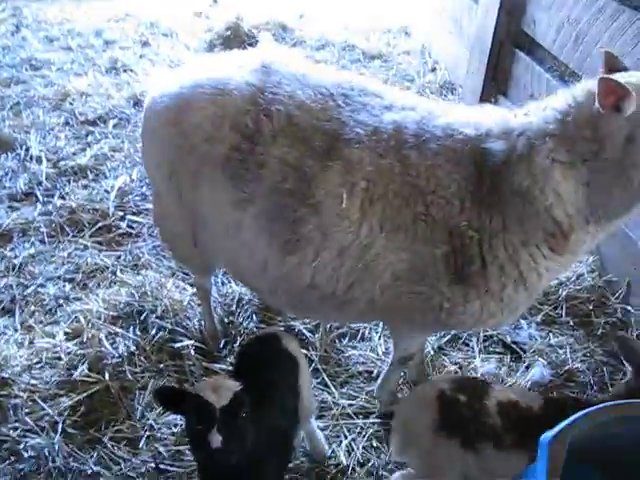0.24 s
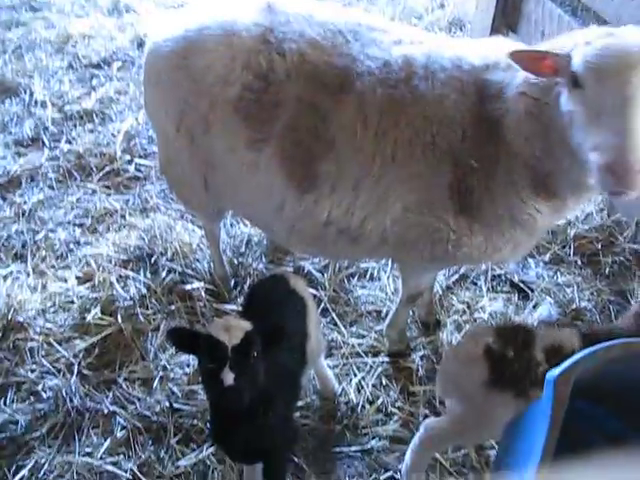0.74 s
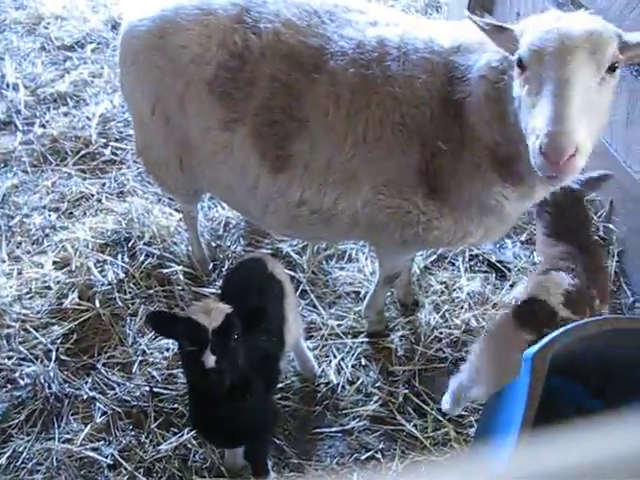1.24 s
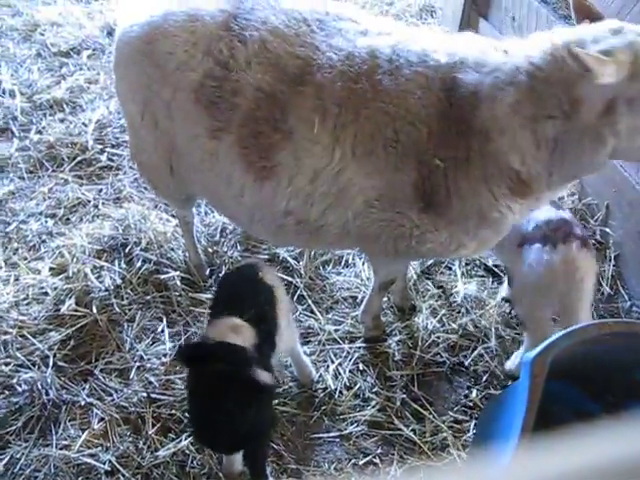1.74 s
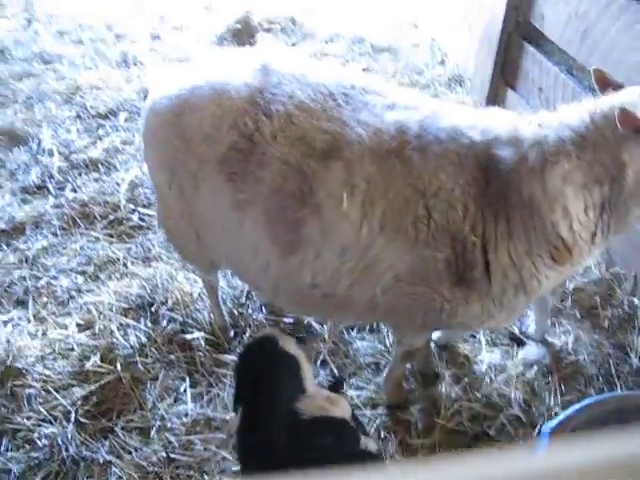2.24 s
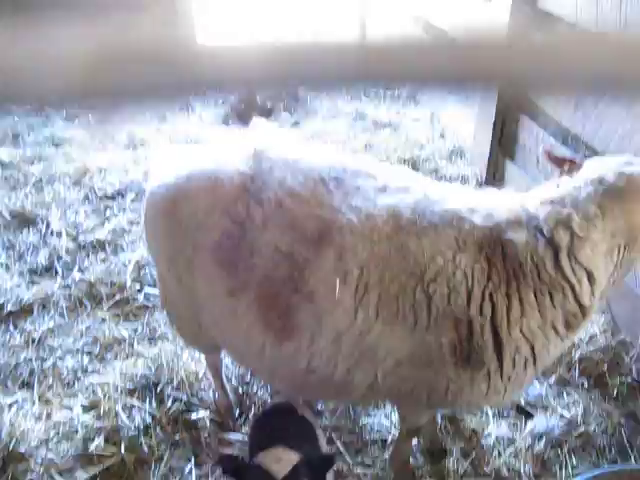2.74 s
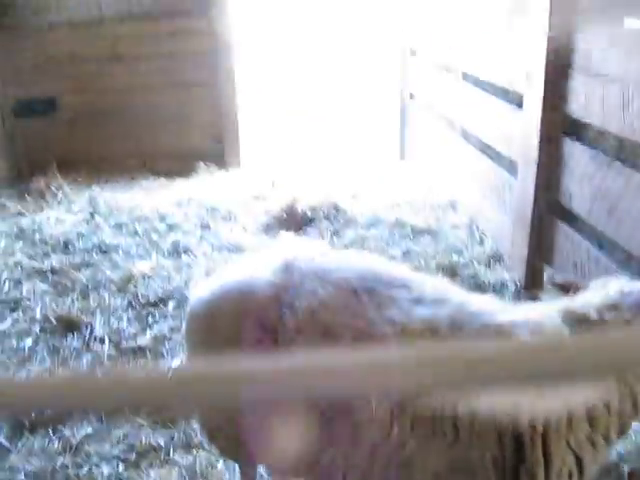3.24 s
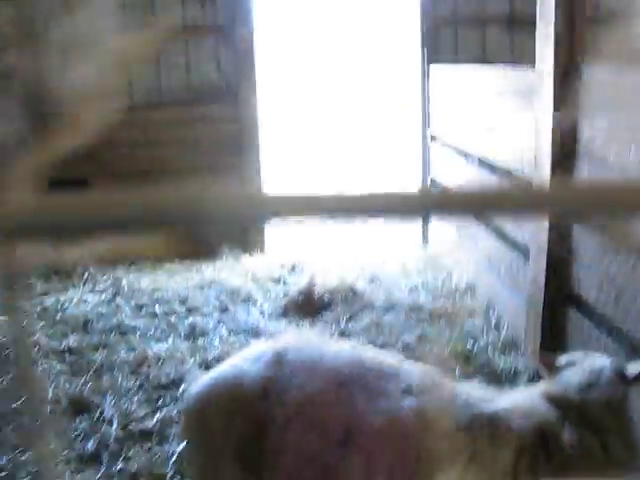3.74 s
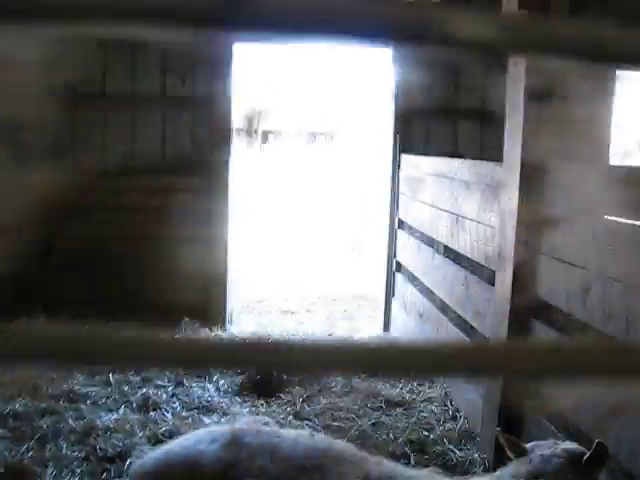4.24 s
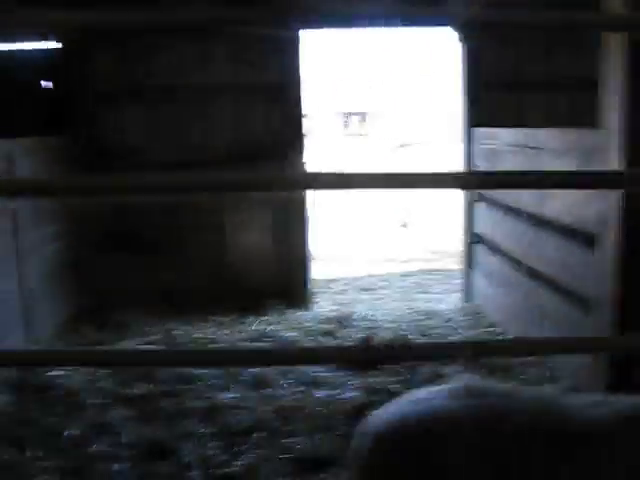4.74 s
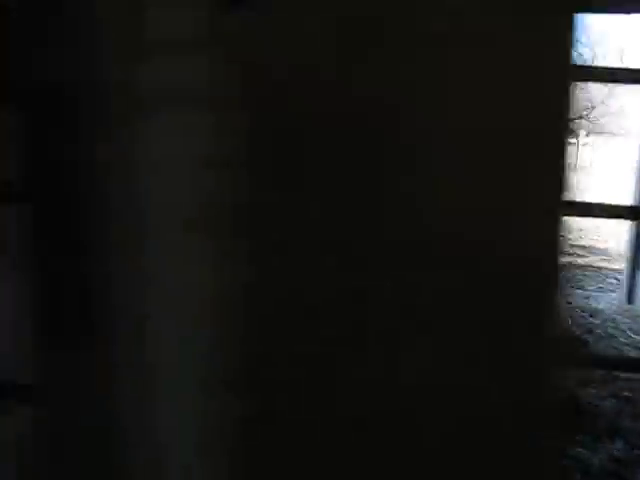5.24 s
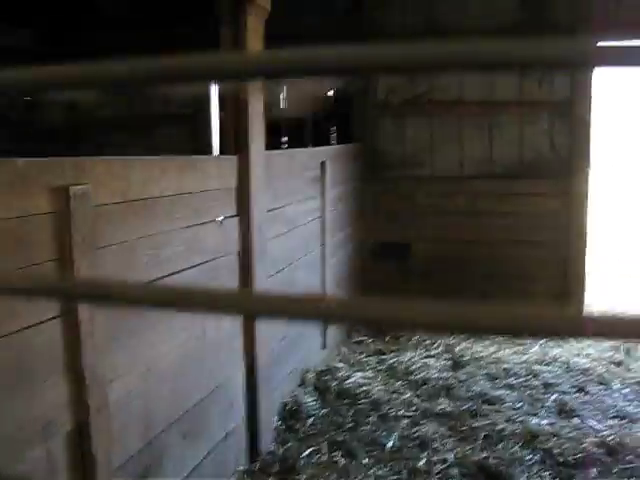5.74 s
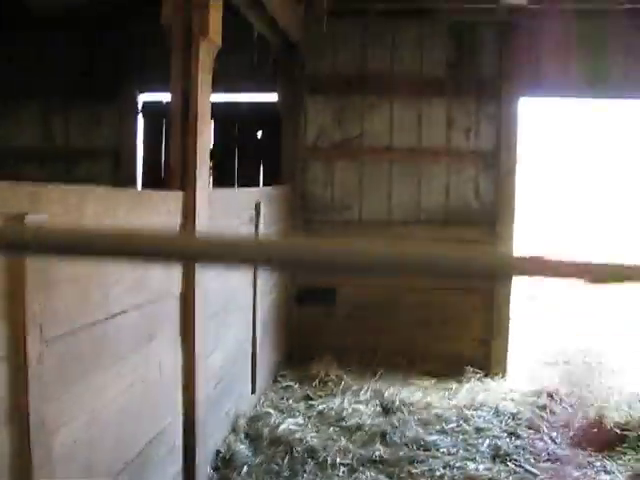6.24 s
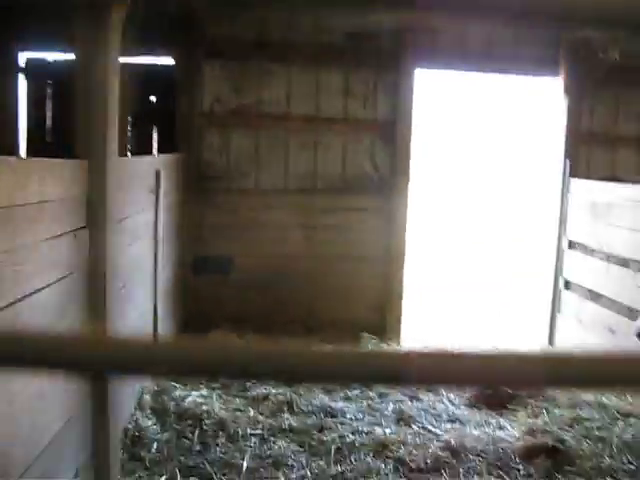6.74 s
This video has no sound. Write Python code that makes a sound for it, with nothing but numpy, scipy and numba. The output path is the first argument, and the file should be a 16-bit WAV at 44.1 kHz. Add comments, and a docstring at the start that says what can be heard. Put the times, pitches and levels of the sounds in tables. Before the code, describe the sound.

In a wooden barn pen, straw crackles and hooves knock; a hoarse lamb bleats quiveringly, later a clear lamb calls and the hoarse one answers.

```python
"""A straw-bedded pen in a wooden barn, over a low murmur: first hooves knock on boards, straw crackles, a gate
squeaks and cloth brushes near the microphone. A hoarse lamb bleats with a fast quiver, an animal further off grunts
and yelps, birds whistle outside, the gate chirps, a clear lamb holds one long note and the hoarse one answers.
Voices are fold pulses and breath through throat resonances; straw is clicks in ringing stalks, hooves are bursts
in a board's resonance, gate and birds are gliding sines, and cloth and murmur are coloured noise."""
import sys
import numpy as np
from scipy import signal
from scipy.io import wavfile
from scipy.ndimage import uniform_filter1d
from numba import njit

SR = 44100
rng = np.random.default_rng(int(sys.argv[2]) if len(sys.argv) > 2 else 0)


def wrap_up_sound(samples):
    """Save the sound to the file named by the first command line argument, as 16-bit audio."""
    columns = np.atleast_2d(samples).T
    # keep every value between -1 and 1, then stretch to whole-number steps
    tamed = np.clip(columns, -1, 1)
    steps = np.round(tamed * 32767).astype(np.int16)
    wavfile.write(sys.argv[1], SR, steps)


N = 308700

# Calls of the hoarse lamb, the clear lamb and the animal further off (a yelp that breaks to a lower note, two grunts).
# Each row of a call: time in seconds, pitch in Hz before the quiver, level in dB before the quiver.
HOARSE_CALLS = [
    [(2.62, 253.3, -61), (2.635, 266, -27), (2.655, 302, -24.5), (2.675, 294, -60)],
    [(2.69, 293.7, -40), (2.722, 317.9, -20), (2.755, 300, -30.5), (2.785, 316.4, -17.5),
     (2.86, 336.5, -22), (2.92, 363.3, -23), (3.1, 369.4, -25.5), (3.2, 369.8, -23), (3.3, 355.6, -23),
     (3.39, 355.6, -23.5), (3.415, 337, -24)],
    [(6.62, 310.7, -49), (6.72, 326.6, -27.5), (6.78, 327.8, -21.5), (6.85, 340.4, -21.5),
     (6.92, 350, -23.5), (7.0, 368, -20)],
]
CLEAR_CALLS = [
    [(6.0, 262, -49), (6.05, 272.6, -37.5), (6.09, 306, -26.5), (6.11, 296.4, -34.5), (6.13, 299.2, -18),
     (6.155, 346.3, -19.5), (6.2, 354.5, -20), (6.29, 360.8, -22.5), (6.37, 362.9, -19.5),
     (6.5, 357.5, -19.5), (6.6, 357.8, -19.5), (6.69, 347, -21.5), (6.735, 332.4, -16.5), (6.76, 343, -54)],
]
YELP_CALLS = [
    [(4.6, 375.6, -46), (4.62, 397.7, -33.5), (4.64, 521.3, -24.5), (4.68, 521.4, -18), (4.688, 455, -19),
     (4.715, 455.7, -14.5), (4.74, 449.5, -30), (4.77, 449.6, -23), (4.8, 452, -42), (5.02, 451, -49)],
    [(4.255, 302, -36.5), (4.28, 299, -41.5), (4.36, 292, -52)],
    [(4.47, 310, -51), (4.49, 297, -42), (4.54, 297, -71)],
]
# Manner of each call. Each row: time the voice takes hold in seconds, strain until then (0-1),
# easing time of the strain in seconds, quiver rate per second and quiver depth (0-1), both as the voice takes hold.
HOARSE_MANNER = [(2.788, 0.64, .2, 15.2, 0), (2.786, 0.68, 0.18, 15.6, .58), (6.74, 0.89, 0.08, 13.0, 1.0)]
CLEAR_MANNER = [(6.199, 0.79, 0.32, 12.04, 0.037)]
YELP_MANNER = [(4.67, 0.97, 0.031, 11.6, .05), (4.255, 0.04, 0.092, 12, .2), (4.47, 0.045, .1, 12, .1)]
# Throat and mouth resonances. Each row: centre in Hz, width in Hz, gain in dB, then the shift in Hz
# and the rise in dB at full strain.
HOARSE_THROAT = [(306, 60, -21, -20, 15), (705, 170, -9, -8, 2.5), (1450, 200, 2.5, -220, 1),
                 (3200, 440, -0.5, -200, 0), (4570, 450, 2, 50, 1.5), (5440, 650, -3.5, 400, 6.5),
                 (9830, 2570, -16, 1, 7)]
CLEAR_THROAT = [(330, 120, -21, -54, -7), (690, 220, -15, -8, -4.5), (1445, 57, 5, -100, -6.5),
                (3280, 490, -7.5, -300, -1.5), (4430, 363, -16, 300, 13), (5380, 780, -38, 200, 38),
                (9900, 3400, -47.5, 1, 29.5)]
YELP_THROAT = [(298, 55, -3, 1, -38), (483, 370, -8, 1, -6.5), (850, 107, 5, 110, -1.5),
               (1800, 600, -15, 410, 5), (2730, 490, -29.5, 1, 22), (3800, 460, -39.5, 1, 20),
               (6000, 510, -45, 1, 17), (7700, 1400, -45, 1, 19)]
QUIVER_PITCH_SHARE, QUIVER_DB = .042, 3   # pitch and level swing either way at depth 1
LEVEL_LEADS = 0.74   # how far the level swing runs ahead of the quiver cycle, radians
QUIVER_SETS_IN_S = 0.0305   # fade-in before the voice takes hold
QUIVER_LAG, QUIVER_DEEPENS = 0.051, 1.107   # share of cycles lost and of depth gained, per second

# Feet trample the straw. Each row: start in seconds, length in seconds, crackle level in dB.
STRAW = [(0.06, 0.21, -44.5), (0.37, 0.16, -44), (1.2, .36, -43), (2.25, .3, -56.5)]
# Hollow stalks. Each row: pitch in Hz, half the ringing width in Hz, gain in dB.
STALKS = [(3230, 74, -1), (4570, 230, -1), (5180, 90, 3.5), (6480, 63, 0), (8100, 170, 1), (8620, 170, -4),
          (10100, 210, -9)]
# Straw snaps. Each row: start in seconds, starting level in dB, pitch in Hz.
SNAPS = [(0.375, -23, 8300), (0.4473, -26, 8240), (0.5176, -34, 2810), (0.718, -39, 8200),
         (1.0725, -34, 8200), (1.202, -33, 6450), (1.2358, -30, 6450), (1.251, -28.5, 8780),
         (1.295, -26, 6490), (1.3153, -22, 7780), (1.432, -27, 5300), (1.5013, -25.5, 3280),
         (2.154, -29, 2710), (2.1656, -31, 9090), (2.1724, -30, 3090), (2.187, -30.5, 11500),
         (2.198, -31, 3160), (2.251, -31.5, 7260), (2.2837, -29, 6760), (2.3236, -27.5, 6700),
         (2.36, -37.5, 7100), (4.766, -31, 2610), (5.227, -32, 2500), (5.3707, -30.5, 4660),
         (5.4895, -36, 11500)]
STRAW_RISE_DB_PER_S, STRAW_FALL_DB_PER_S = 128, 220
SNAP_T60_S, SNAP_RING_SHARE = 0.024, 0.48   # ring relative to the bare crack

# Cloth brushes near the microphone. Each row: start in seconds, length in seconds, hiss level in dB.
CLOTH = [(0.02, .26, -51), (0.37, 0.11, -49.5), (.94, .2, -55), (0.6, .18, -53.5), (1.15, 0.38, -54),
         (1.6, .85, -53), (1.66, .08, -47.5), (1.78, .02, -47.5), (1.94, .04, -46), (2.07, .04, -45),
         (2.5, 1.1, -48), (3.6, .12, -45.5), (3.82, 2.1, -48.5), (3.88, .1, -45), (4.15, .09, -46.5),
         (4.45, .28, -46.5), (4.76, 0.091, -38), (4.96, 0.12, -40.5), (5.2, 0.12, -42), (5.5, .24, -41),
         (5.9, 0.64, -45), (6.67, .1, -37), (6.8, .2, -50)]
# Spectrum of the cloth. Each row: frequency in Hz, relative density in dB per Hz.
CLOTH_COLOUR = [(1500, -39), (3000, -2.5), (6000, -4), (10000, -2), (15500, -3.5)]
CLOTH_RISE_DB_PER_S, CLOTH_FALL_DB_PER_S, CLOTH_REST_DB = 135, 127, -59

# Hooves on boards. Each row: start in seconds, starting level in dB, centre in Hz, 60 dB decay time in seconds.
KNOCKS = [(0.025, -36, 190, 0.07), (0.4, -40.5, 300, 0.29), (0.5, -36.5, 1200, 0.12),
          (0.739, -37.5, 149, 0.069), (1.255, -32.5, 244, 0.077), (3.5, -37.5, 240.4, 0.1),
          (2.251, -32, 107, 0.088), (2.252, -29.5, 440, 0.09), (2.283, -25, 740, 0.039),
          (4.01, -37.5, 835, 0.19), (4.24, -36, 860, 0.11), (4.475, -39.5, 724, 0.24),
          (5.165, -32, 660, 0.24), (5.415, -31, 600, 0.18), (5.765, -35, 300, 0.041),
          (5.981, -40.5, 714, 0.24)]

# Gate squeaks. Each row: start in seconds, level in dB, length in seconds.
SQUEAKS = [(0.313, -45, 0.11), (3.644, -43, 0.084), (4.124, -41.5, 0.084), (5.356, -42, 0.09)]
# Partials of every squeak. Each row: start in Hz, end in Hz, gain in dB, delay in seconds, share of the squeak length.
SQUEAK_PARTIALS = [(635, 640, 2.5, .015, 1.39), (1147, 1320, 4, 0.00062, 0.41),
                   (1462, 1580, 5.5, 0.05, 0.37), (1890, 2200, 0, 0.0298, 0.19)]
# Short metal chirp. Each row: start in seconds, starting level in dB, pitch in Hz of the lower of two partials.
CHIRPS = [(5.942, -28, 1340)]

# Faint whistles outside. Each row: start in seconds, start in Hz, end in Hz, length in seconds, level in dB.
BIRDS = [(5.058, 2970, 2870, 0.097, -50), (5.5, 2770, 2960, 0.15, -53), (5.707, 3050, 2930, 0.054, -44.5),
         (5.715, 3900, 3960, .13, -50.5), (5.798, 2970, 3100, 0.083, -52)]

# Spectra of the barn's shuffle and rumble. Each row: frequency in Hz, relative density in dB per Hz.
SHUFFLE_COLOUR = [(250, -6.5), (500, -4.5), (800, 2), (1100, -3.5), (1500, -1.5), (2100, -8), (3000, -15),
                  (8000, -27.5)]
RUMBLE_COLOUR = [(20, -35), (40, -8.5), (90, 4), (130, -0.5), (250, -5), (500, -27)]
# Rumble in the course of time. Each row: time in seconds, level in dB before the dips.
RUMBLE_LEVEL = [(0, -44), (.5, -52.5), (1.0, -59), (2.0, -53), (2.3, -51.5), (2.7, -58), (3.45, -52),
                (4.6, -56), (6.1, -53), (7, -58)]
# The murmur dips during two bleats. Each row: start in seconds, length in seconds, depth in dB for the shuffle.
DIPS = [(2.83, 0.48, 13.5), (6.2, 0.086, 13.5)]
SHUFFLE_DB = -46.5   # outside the dips
DIP_IN_DB_PER_S, DIP_OUT_DB_PER_S, RUMBLE_DIP_SHARE = 173, 122, 0.74

BARN_T60_S, WALL_CUT_HZ = 0.38, 5730
CUTOFF_HZ = 15900   # top of the microphone's band


def amp(db):
    """Decibels to gain."""
    return 10 ** (np.asarray(db) / 20)


def rms_one(x):
    """Scale to rms 1."""
    return x / np.sqrt(np.mean(x ** 2) + 1e-20)


def in_time(rows, t):
    """Columns of a table joined by straight lines at the times t."""
    s, *columns = np.transpose(rows)
    return [np.interp(t, s, column) for column in columns]


def swells(rows, rise_db_per_s, fall_db_per_s, rest_db):
    """Level in dB of events that rise, hold and fall back to a resting level."""
    t = np.arange(N) / SR
    levels = [np.full(N, rest_db)]
    for s, length, db in rows:
        rise = rise_db_per_s * np.maximum(s - t, 0)
        fall = fall_db_per_s * np.maximum(t - s - length, 0)
        levels.append(db - rise - fall)
    return np.max(levels, axis=0)


def drift(rate, size):
    """Random wander of spread 1: noise through two equal low-pass poles at rate in Hz."""
    r = np.exp(-2 * np.pi * rate / SR)
    noise = rng.standard_normal(size + SR)
    return rms_one(signal.lfilter([1], [1, -2 * r, r * r], noise)[SR:])   # one second to settle


def resonate(x, hz, width):
    """One fixed resonance, gain 1 on top."""
    r = np.exp(-np.pi * width / SR)
    feed = np.array([1, 0, -1]) * (1 - r * r) / 2
    return signal.lfilter(feed, [1, -2 * r * np.cos(2 * np.pi * hz / SR), r * r], x)


@njit
def gliding(x, hz, r, rate):
    """A resonance whose centre moves, gain 1 on top."""
    y = np.zeros(len(x))
    for i in range(2, len(x)):
        fed = (1 - r * r) / 2 * (x[i] - x[i - 2])
        y[i] = fed + 2 * r * np.cos(2 * np.pi * hz[i] / rate) * y[i - 1] - r * r * y[i - 2]
    return y


def highpass(x, hz, order):
    """Butterworth high-pass."""
    return signal.sosfilt(signal.butter(order, hz, "high", fs=SR, output="sos"), x)


def coloured(spectrum, patchy_db):
    """Half-octave bands of noise, each flickering a little on its own; rms 1."""
    hz, density_db = np.transpose(spectrum)
    edges = 20 * 2 ** np.arange(0, 10.1, .5)
    white = rng.standard_normal((2, N))   # neighbouring bands take different noise
    out = 0
    for k, (low, high) in enumerate(zip(edges, edges[1:])):
        band = signal.sosfilt(signal.butter(2, [low, high], "band", fs=SR, output="sos"), white[k % 2])
        flicker = np.interp(np.arange(N), np.linspace(0, N, 90), rng.standard_normal(90))
        band_db = np.interp(np.log(low * high) / 2, np.log(hz), density_db)
        out = out + band * amp(band_db + patchy_db * flicker)
    return rms_one(out)


def add(out, s, x):
    """Mix x into out from time s."""
    i = round(s * SR)
    out[i:i + len(x)] += x[:N - i]


def fold_pulses(t, phase, pitch, wander_db):
    """Up to 55 partials of the vocal folds, each swelling and fading by itself as the head moves."""
    knots = np.arange(t[0], t[-1] + .1, .06)
    pulses = np.zeros(len(t))
    for k, row in enumerate(rng.standard_normal((55, len(knots))), 1):
        wander = wander_db * np.interp(t, knots, row)
        pulses += amp(wander) * np.cos(k * phase + 0.23 * wander) * (k * pitch < CUTOFF_HZ)
    return rms_one(pulses)


def throat_sound(source, throat, strain):
    """Parallel throat resonances of alternating sign that shift and change level with strain."""
    sound = np.zeros(len(source))
    for k, (hz, width, db, shift, rise_db) in enumerate(throat):
        ring = gliding(source, hz + shift * strain, np.exp(-np.pi * width / SR), SR)
        sound += (-1) ** k * amp(db + rise_db * strain) * ring
    return sound


def voice(calls, manners, throat, jitter, wander_db, breath_rest, breath_strained, breath_per_db, air_hz=2500):
    """Vocal-fold pulses and breath gated by each cycle, through throat resonances that shift with strain."""
    out = np.zeros(N)
    for rows, (hold_s, strain, ease_s, rate, depth) in zip(calls, manners):
        t = np.arange(rows[0][0], rows[-1][0], 1 / SR)
        pitch, level_db = in_time(rows, t)
        since = t - hold_s
        strain = strain * np.exp(-np.maximum(since, 0) / ease_s)
        depth = depth * np.clip(1 + since / QUIVER_SETS_IN_S, 0, 1) * (1 + QUIVER_DEEPENS * since)
        # breath follows strain and how far the level lies below its top
        breath = breath_rest + breath_strained * strain + breath_per_db * (level_db.max() - level_db)

        turn = 2 * np.pi * rate * since * (1 - QUIVER_LAG * since)
        quiver = depth * np.cos(turn + .7 * (1 - np.cos(turn)))   # slow rise, quick fall
        unsteady = jitter * np.clip(breath, 0, 1) * drift(55.5, len(t))
        pitch = pitch * (1 + QUIVER_PITCH_SHARE * quiver + unsteady)
        phase = 2 * np.pi * np.cumsum(pitch) / SR
        pulses = fold_pulses(t, phase, pitch, wander_db)

        # the folds slip and rasp while the pitch drops
        breath = np.clip(breath + 0.18 * depth * np.maximum(np.sin(turn), 0) ** 2, 0, .95)
        air = highpass(rng.standard_normal(len(t)), air_hz, 1)
        source = (1 - breath) * pulses + breath * (1 + np.cos(phase)) * air
        sound = throat_sound(source, throat, strain)
        # level out over 25 ms: effort alone sets the loudness
        sound = sound / np.sqrt(uniform_filter1d(sound ** 2, size=1100) + 1e-12)
        add(out, t[0], sound * amp(level_db + QUIVER_DB * depth * np.cos(turn + LEVEL_LEADS)))
    return out


def straw():
    """Random clicks in clumps ring the hollow stalks; each loud snap is a short burst with a pitch of its own."""
    born = rng.random(N) < 1800 * amp(4.5 * drift(25, N)) / SR
    size_db = 2.3 * np.minimum(rng.exponential(1, N), 5)
    clicks = born * amp(size_db) * rng.choice([-1, 1], N)
    rung = sum(amp(db) * resonate(clicks, hz, 2.0 * half_width) for hz, half_width, db in STALKS)
    bright = highpass(clicks, 2000, 2)
    level_db = swells(STRAW, STRAW_RISE_DB_PER_S, STRAW_FALL_DB_PER_S, rest_db=-73)
    out = rms_one(rms_one(rung) + 1.35 * rms_one(bright)) * amp(level_db)
    t = np.arange(0, .05, 1 / SR)
    for s, start_db, hz in SNAPS:
        crack = rng.standard_normal(len(t))
        ring = rms_one(resonate(crack, hz, 0.11 * hz))
        burst = rms_one(SNAP_RING_SHARE * ring + crack)
        add(out, s, amp(start_db - 60 * t / SNAP_T60_S) * np.minimum(t / 0.001, 1) * burst)
    return out


def cloth():
    """Rubbing fabric close to the microphone: bright noise that swells out of a faint steady hiss."""
    level_db = swells(CLOTH, CLOTH_RISE_DB_PER_S, CLOTH_FALL_DB_PER_S, CLOTH_REST_DB)
    return amp(level_db) * coloured(CLOTH_COLOUR, patchy_db=2.5)


def hooves():
    """A dying burst of noise in the broad resonance of a board."""
    out, t = np.zeros(N), np.arange(0, .3, 1 / SR)
    for s, start_db, hz, t60 in KNOCKS:
        board = rms_one(resonate(rng.standard_normal(len(t)), hz, 0.58 * hz))
        add(out, s, amp(start_db - 60 * t / t60) * np.minimum(t / 0.011, 1) * board)
    return out


def gate():
    """Each squeak is a held low partial under short rising ones; the chirp is two partials dying fast."""
    out = np.zeros(N)
    for s, level_db, length in SQUEAKS:
        for start_hz, end_hz, db, delay, share in SQUEAK_PARTIALS:
            t = np.arange(0, length * share, 1 / SR)
            hz = np.linspace(start_hz, end_hz, len(t)) + 20 * drift(94, len(t))
            tone = np.sin(2 * np.pi * np.cumsum(hz) / SR)
            add(out, s + delay, amp(level_db + db) * np.sin(np.pi * t / t[-1]) * tone)
    t = np.arange(0, .12, 1 / SR)
    for s, start_db, hz in CHIRPS:
        both = np.sin(2 * np.pi * hz * t) + 1.2 * np.sin(4 * np.pi * hz * t)
        add(out, s, amp(start_db - 60 * t / 0.056) * np.minimum(t / 0.0056, 1) * both)
    return out


def birds():
    """Whistles outside: short sines that glide and waver."""
    out = np.zeros(N)
    for s, start_hz, end_hz, length, level_db in BIRDS:
        t = np.arange(0, length, 1 / SR)
        hz = np.linspace(start_hz, end_hz, len(t)) + 90 * drift(85, len(t))
        tone = np.sin(2 * np.pi * np.cumsum(hz) / SR)
        add(out, s, amp(level_db) * np.sin(np.pi * t / length) * tone)
    return out


def barn_echo(x):
    """Dense reflections off the boards: dying noise as the impulse response, treble softened."""
    t = np.arange(0, 1.4 * BARN_T60_S, 1 / SR)
    tail = rng.standard_normal(len(t)) * amp(-60 * t / BARN_T60_S) * (t > .008)
    tail = signal.sosfilt(signal.butter(2, WALL_CUT_HZ, fs=SR, output="sos"), tail)
    return signal.fftconvolve(x, tail / np.sqrt(np.sum(tail ** 2)))[:N]


def murmur():
    """The barn's background: noise in a middle shuffle and a low rumble, both dipping briefly during two bleats."""
    dip_db = swells(DIPS, DIP_IN_DB_PER_S, DIP_OUT_DB_PER_S, rest_db=0)
    shuffle = amp(SHUFFLE_DB - dip_db) * coloured(SHUFFLE_COLOUR, patchy_db=1.0)
    rumble_db = in_time(RUMBLE_LEVEL, np.arange(N) / SR)[0] - RUMBLE_DIP_SHARE * dip_db
    return shuffle + amp(rumble_db) * coloured(RUMBLE_COLOUR, patchy_db=1.5)


def scene():
    """Near and far animals with their own share of echo, over the noises of the pen."""
    hoarse = voice(HOARSE_CALLS, HOARSE_MANNER, HOARSE_THROAT, jitter=0.0149, wander_db=2.0,
                   breath_rest=.12, breath_strained=0.49, breath_per_db=-0.02)
    clear = voice(CLEAR_CALLS, CLEAR_MANNER, CLEAR_THROAT, jitter=0.021, wander_db=4.5,
                  breath_rest=.02, breath_strained=0.026, breath_per_db=.022)
    yelp = voice(YELP_CALLS, YELP_MANNER, YELP_THROAT, jitter=0.03, wander_db=4.0,
                 breath_rest=.3, breath_strained=.3, breath_per_db=.001, air_hz=400)
    far = gate() + hooves() + birds()
    echo = barn_echo(amp(-10.0) * hoarse + amp(-11.5) * clear + amp(-8.0) * yelp + amp(-4) * far)
    voices = clear - hoarse + yelp   # the hoarse lamb's direct sound is inverted
    mono = voices + straw() + cloth() + far + echo + murmur()
    return np.array([mono, mono])


def record(dry):
    """One microphone on both channels; peaks are rounded, the top is cut."""
    rounded = .8 * np.tanh(dry / .8)
    top_cut = signal.cheby2(16, 70, CUTOFF_HZ + 300, fs=SR, output="sos")
    return signal.sosfilt(top_cut, rounded)


dry = scene()
out = record(dry)
wrap_up_sound(out)
```